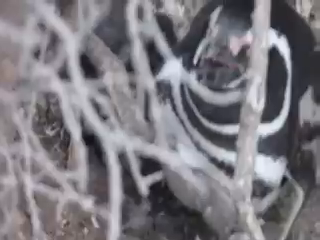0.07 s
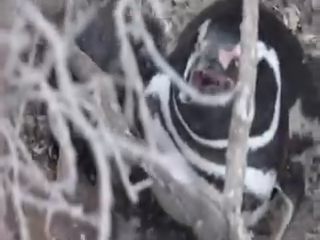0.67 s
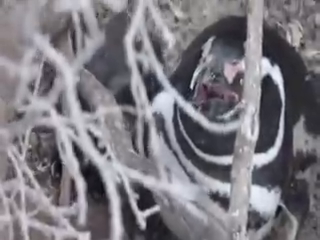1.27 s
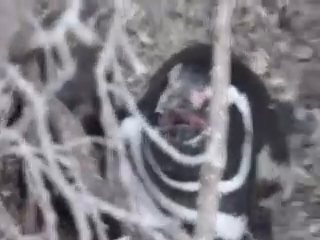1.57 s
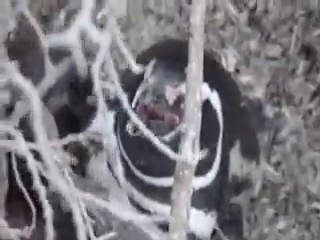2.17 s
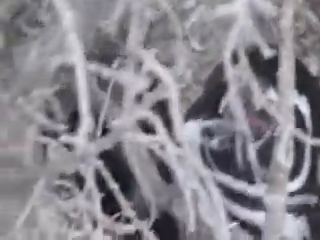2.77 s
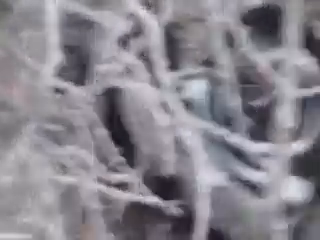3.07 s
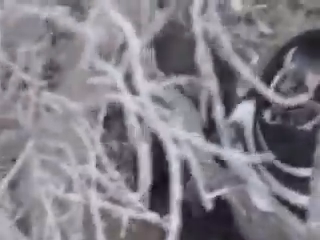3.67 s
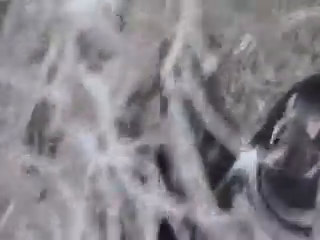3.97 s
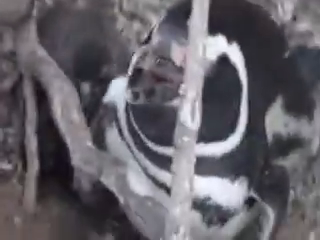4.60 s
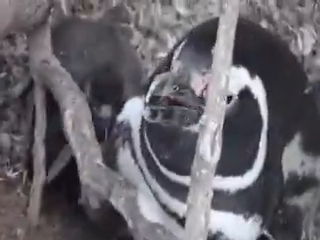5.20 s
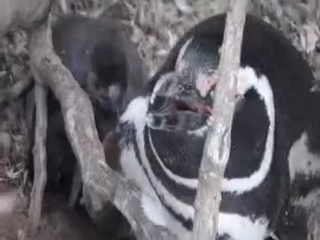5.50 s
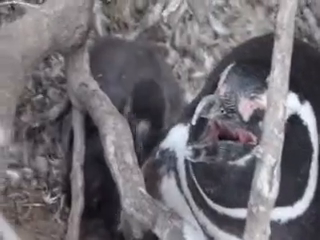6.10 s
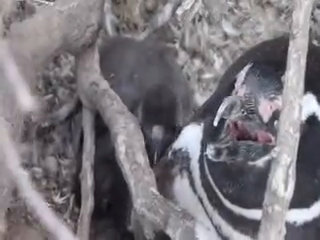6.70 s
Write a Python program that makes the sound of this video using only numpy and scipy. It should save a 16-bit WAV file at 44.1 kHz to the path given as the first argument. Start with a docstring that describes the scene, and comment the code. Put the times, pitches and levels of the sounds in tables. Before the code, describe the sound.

Steady wind hisses outdoors while a penguin chick peeps near the microphone, about three calls every two seconds. Each peep is a short cluster of high whistles that rises and falls. Soft scuffs of dry litter and hoarse squeaks fill the early gaps; later, twigs crackle briefly and thin, faint whines sag between the calls. The nest hollow adds a very slight echo.

```python
"""A penguin chick begs close by, from a nest under dry scrub: ten arched peeps, each a chord of four
whistles that ride one push of air and modulate each other in the throat. Hoarse squeaks and faint
falling whines come between them. Nest litter rustles, twigs snap, one small tick sounds, and the
nest hollow adds a short echo. Behind it a steady wind hisses; faint low noise swells three times."""
import sys
import numpy as np
from scipy import signal
from scipy.fft import rfft, irfft, next_fast_len
from scipy.io import wavfile
from scipy.ndimage import map_coordinates

SR = 44100
rng = np.random.default_rng(int(sys.argv[2]) if len(sys.argv) > 2 else 0)


def dump(signal):
    """Clip the signal to [-1, 1] and save it as 16-bit WAV at the path in sys.argv[1]."""
    limited = np.clip(np.atleast_2d(signal).T, -1, 1)
    pcm = np.round(limited * 32767).astype(np.int16)
    wavfile.write(sys.argv[1], SR, pcm)


N = 302085


def amp(db):
    return 10 ** (np.asarray(db) / 20)


def unit(x):
    return x / np.sqrt(np.mean(x ** 2) + 1e-20)


def ramp(x):
    return np.clip(x, 0, 1)


def along(points, hz):
    """Interpolate (freq_hz, value) points on a log frequency axis."""
    freq_hz, values = np.transpose(points)
    return np.interp(np.log(hz + 1), np.log(freq_hz + 1), values)


def filtered(x, response):
    """Apply the frequency response(hz) to x."""
    size = next_fast_len(len(x) + 8192)
    return irfft(rfft(x, size) * response(np.fft.rfftfreq(size, 1 / SR)), size)[:len(x)]


def noise(spectrum, n):
    """Noise at rms 1, shaped by (freq_hz, density_db) points."""
    return unit(filtered(rng.standard_normal(n), lambda hz: amp(along(spectrum, hz))))


def wobble(rate_hz, n):
    """Smooth random curve, rate_hz knots a second."""
    knots = rng.standard_normal(int(n * rate_hz / SR) + 4)
    return map_coordinates(knots, [np.arange(n) * rate_hz / SR])


def phase(hz):
    """Running phase of a gliding pitch, from a random start."""
    return 2 * np.pi * (np.cumsum(hz) / SR + rng.random())


def swell(length_s, taper):
    """Envelope with cosine ends; taper is their share of the length."""
    return signal.windows.tukey(int(length_s * SR), taper)


def add(track, start_s, sound):
    part = track[round(start_s * SR):][:len(sound)]
    part += sound[:len(part)]


def wind(level_db=-52.0, gust_db=0.14, flutter_db=0.5):
    """A broad, even rush that barely swells."""
    # wind spectrum: freq_hz, density_db
    spectrum = [(20, -15.5), (45, -8.5), (70, -5), (130, -1.5), (230, 1), (400, -1), (800, -3.5),
                (1600, -6.5), (2700, -9.5), (4000, -12), (5000, -16), (6300, -16.5), (9000, -20.5)]
    return amp(level_db + gust_db * wobble(2.23, N) + flutter_db * wobble(12, N)) * noise(spectrum, N)


def squeaks(flutter_db=3, fade_db=8):
    """Hoarse whistles that do not lock: pitch and strength scatter quickly."""
    # squeaks: start_s, length_s, start_hz, end_hz, level_db, scatter_hz
    calls = [(0.081, 0.07, 3200, 2740, -44.5, 60), (0.137, 0.063, 3120, 3130, -46.5, 90),
             (0.14, 0.2, 2605, 2260, -54, 110), (0.163, .22, 3940, 3750, -52.5, 187),
             (0.112, 0.33, 1930, 1777, -56, 190), (0.82, 0.032, 3040, 3070, -50, 130),
             (0.807, 0.29, 2530, 2083, -53, 184), (0.831, 0.122, 3890, 3860, -54.5, 100),
             (0.917, 0.22, 3590, 3340, -54.5, 90), (1.534, 0.25, 3610, 3500, -50.5, 120),
             (2.26, 0.2, 3410, 3570, -50.5, 145), (5.274, 0.11, 3370, 3280, -57, 150),
             (6.056, 0.22, 3300, 2940, -57.5, 151)]
    out = np.zeros(N)
    for start_s, length_s, start_hz, end_hz, level_db, scatter_hz in calls:
        env = swell(length_s, taper=0.4)
        n = len(env)
        env *= amp(level_db + fade_db * np.linspace(0.5, -0.5, n))
        pitch_hz = np.linspace(start_hz, end_hz, n) + scatter_hz * wobble(1400, n)
        add(out, start_s, env * unit(np.sin(phase(pitch_hz)) * amp(flutter_db * wobble(200, n))))
    return out


def low_swells():
    """Three brief, faint swells of low noise near 240 Hz."""
    # swells: start_s, length_s, level_db
    swells = [(0.097, 0.28, -56.5), (.5, 0.42, -61), (5.252, 0.45, -62.5)]
    # low noise spectrum: freq_hz, density_db
    low_band = [(120, -32), (205, -3.5), (240, 0.5), (280, -3), (400, -28)]
    env = np.zeros(N)
    for start_s, length_s, level_db in swells:
        add(env, start_s, amp(level_db) * swell(length_s, taper=0.55))
    return env * noise(low_band + [(1000, -120)], N)


def litter(clump_db=1.5, crack_t60_s=0.017, knock_t60_s=0.046, ring_hz=2780, width_hz=200, ring_db=1.0):
    """Dry stems rub in clumps of tiny grains and snap in short bursts; both ring the twigs."""
    # scuffs in the litter: start_s, length_s, dull_db, crisp_db
    scuffs = [(0.1, 0.16, -47.5, -71), (0.228, 0.18, -49.5, -55), (.8, 0.16, -53, -53.5),
              (0.889, 0.21, -54.5, -60), (1.5, 0.34, -52.5, -57.5), (1.786, 0.19, -53, -68),
              (2.24, 0.25, -55, -62.5), (2.806, 0.34, -51, -54.5), (3.065, 0.12, -44, -36),
              (3.128, 0.28, -48, -53.5), (3.356, 0.073, -50, -45), (3.357, 0.5, -58, -60.5),
              (3.541, 0.091, -55, -55.5), (3.702, 0.35, -50, -56), (4.99, 0.043, -46.5, -51),
              (5.074, 0.053, -50, -48), (6.795, 0.14, -53.5, -63)]
    # twig snaps: start_s, crack_db, knock_db
    snaps = [(0.107, -51, -44), (4.827, -68, -54), (4.889, -37, -45), (4.899, -58, -51),
             (4.926, -43.5, -49.5), (4.971, -52, -51), (5.014, -47.5, -54), (5.02, -47, -52),
             (5.0359, -28.5, -42), (5.095, -41, -58)]
    # rustle and knock spectrum: freq_hz, density_db
    dull_spectrum = [(1400, -37), (2300, -7), (2650, -4), (3250, -3), (3700, -3), (4500, -7), (6000, -23.5),
                     (9000, -26)]
    # crackle and crack spectrum: freq_hz, density_db
    crisp_spectrum = [(1500, -39.5), (3000, -14.5), (4200, -23), (5200, 3), (6100, 2.5), (7000, -7),
                      (9500, -8)]
    dull, crisp = np.zeros(N), np.zeros(N)
    for start_s, length_s, dull_db, crisp_db in scuffs:
        env = swell(length_s, taper=0.59)
        add(dull, start_s, amp(dull_db) * env)
        add(crisp, start_s, amp(crisp_db) * env)
    clumps = unit(amp(clump_db * wobble(350, N)))
    dull, crisp = dull * clumps, crisp * clumps
    t = np.arange(SR // 10) / SR
    attack = 2 * (1 - np.exp(-t / 0.00057))
    for start_s, crack_db, knock_db in snaps:
        add(dull, start_s, attack * amp(knock_db - 60 * t / knock_t60_s))
        add(crisp, start_s, attack * amp(crack_db - 60 * t / crack_t60_s))

    def twig(hz):
        damping = 1j * hz * width_hz
        return 0.79 + amp(ring_db) * damping / (ring_hz ** 2 - hz ** 2 + damping)
    return filtered(dull * noise(dull_spectrum, N), twig) + crisp * noise(crisp_spectrum, N)


def whines(jitter=0.018, third_harmonic_db=-8, flutter_db=3):
    """Thin, unsteady notes that hold their pitch, then sag."""
    # whines: start_s, length_s, start_hz, end_hz, fundamental_db, octave_db
    calls = [(0.404, 0.075, 1690, 1520, -67.5, -54.5), (2.482, 0.075, 1777, 1476, -62, -63),
             (4.424, 0.26, 1807, 1674, -59, -54.5), (5.19, 0.2, 1836, 1764, -59, -61),
             (5.321, 0.15, 1920, 1650, -56, -59), (6.049, 0.3, 2048, 1685, -56.5, -57)]
    out = np.zeros(N)
    for start_s, length_s, start_hz, end_hz, fundamental_db, octave_db in calls:
        env = swell(length_s, taper=0.11)
        n = len(env)
        env *= unit(amp(flutter_db * wobble(120, n)))
        pitch_hz = start_hz + (end_hz - start_hz) * np.linspace(0, 1, n) ** 2
        p = phase(pitch_hz * (1 + jitter * wobble(500, n)))
        odd = amp(fundamental_db) * (np.sin(p) + amp(third_harmonic_db) * np.sin(3 * p))
        add(out, start_s, env * (odd + amp(octave_db) * np.sin(2 * p)))
    return out


def whistles(shape, attack_s=0.0025, release_s=0.024, accent_db=2, accent_s=0.029,
             tail_s=0.044, tail_db=-59, tail_sag_per_s=1.7):
    """Pitches and strengths of four whistles: the push rises fast, sways on its crest and falls away."""
    # response to the crest's climb and dip, per whistle: ratio
    sway_ratio = [.7, 0.63, 0.86, 1.1]
    # response to the fall, per whistle: ratio
    fall_ratio = [.68, 0.74, 1, 1.05]
    # early overshoot of the crest, per whistle: log_pitch
    overshoot_log = [.005, .008, .012, .022]
    # level lost as the push slackens, per whistle: db_per_log_pitch
    slack_db = [35.2, 37.7, 23, 22.6]
    length_s, rise_s, fall_s, *crest_hz, climb_log, dip_log, dip_share, scoop_log = shape[:11]
    low_db, third_db, top_db, throat_hz, throat_db, fade_in_s, fade_out_s = shape[11:]
    rise_log, fall_log, throat_width_hz = 0.365, 0.396, 270
    t = np.arange(int((length_s + tail_s) * SR)) / SR
    left_s, progress = length_s - t, t / length_s

    rising = np.exp(-t / rise_s)
    falling = fall_log * np.maximum(1 - left_s / fall_s, 0) ** 1.9
    falling += tail_sag_per_s * np.maximum(-left_s, 0)
    sway = climb_log * (progress - 0.5) - dip_log * np.exp(-((progress - dip_share) / 0.0837) ** 2)
    arch = np.outer(sway_ratio, sway) - np.outer(fall_ratio, falling)
    arch -= np.outer([scoop_log, scoop_log, rise_log, rise_log], rising)
    arch += np.outer(overshoot_log, np.exp(-((t - 0.062) / 0.0211) ** 2))
    pitch_hz = np.c_[crest_hz] * np.exp(arch)

    crest_db = np.c_[[low_db - 1.5, low_db, third_db, top_db]]
    strength = amp(crest_db - np.outer(slack_db, rise_log * rising + falling))
    # the upper pair sweeps through the throat resonance
    throat = amp(throat_db * np.exp(-((pitch_hz[2:] - throat_hz) / throat_width_hz) ** 2))
    accent = amp(accent_db * np.exp(-t / accent_s))
    strength[2:] *= throat * accent * ramp(t / fade_in_s) ** 2 * ramp(left_s / fade_out_s)
    strength[:2] *= ramp(left_s / release_s)
    # the lowest whistle slides on faintly after the others stop
    strength[0] = np.maximum(strength[0], amp(tail_db) * ramp((left_s + tail_s) / release_s))
    return pitch_hz, strength * ramp(t / attack_s)


def peep(shape, rasp_db, quaver=0.005, drift=0.004, jitter=0.004,
         shimmer_db=1.64, waver_db=0.84, rough_db=1, knee_hz=2400):
    """Four whistles on one push of air; nonlinear membranes add octaves, sum tones and sidebands."""
    # air in the throat: freq_hz, density_db
    rasp_spectrum = [(1900, -28.5), (2350, -12.5), (2900, -1), (3400, -0.5), (4300, -3.5), (5000, -5.5),
                     (6300, -21.5), (7500, -5.5), (9500, -11.5)]
    pitch_hz, strengths = whistles(shape)
    n = pitch_hz.shape[1]
    push = 1 + quaver * wobble(45, n)  # bends all four pitches together
    p1, p2, p3, p4 = [phase(hz * push * (1 + drift * wobble(110, n) + jitter * wobble(900, n)))
                      for hz in pitch_hz]
    for strength in strengths:
        strength *= amp(shimmer_db * wobble(70.2, n) + waver_db * wobble(19.5, n))
        strength *= amp(rough_db * wobble(450, n))
    a1, a2, a3, a4 = strengths
    chord = a1 * np.sin(p1) + a2 * np.sin(p2) + a3 * np.sin(p3) + a4 * np.sin(p4)
    octaves = amp(-12) * a1 * np.sin(2 * p1) + amp(-17) * a2 * np.sin(2 * p2)
    octaves *= np.maximum(knee_hz / pitch_hz[0], 1) ** 3.5  # throat muffles low notes, not their octaves
    octaves += amp(-26) * (a3 * np.sin(2 * p3) + a4 * np.sin(2 * p4))
    sums = amp(-19) * (np.sqrt(a1 * a3) * np.sin(p1 + p3) + np.sqrt(a2 * a4) * np.sin(p2 + p4))
    sums += amp(-27) * (np.sqrt(a2 * a3) * np.sin(p2 + p3) + np.sqrt(a1 * a4) * np.sin(p1 + p4))
    sums *= amp(2 * shimmer_db * wobble(32, n))
    sidebands = amp(-16) * np.sqrt(a3 * a4) * (np.sin(p1 + p4 - p3) + 0.5 * np.sin(2 * p4 - p3))
    rasp = amp(rasp_db) * unit(np.hypot(a3, a4)) * noise(rasp_spectrum, n)
    return chord + octaves + sums + sidebands + rasp


def begging():
    """The chick's peeps, about 1.5 a second."""
    # peeps: start_s, length_s, rise_s, fall_s, crest1_hz, crest2_hz, crest3_hz, crest4_hz,
    # climb_log, dip_log, dip_share, scoop_log, low_db, third_db, top_db, throat_hz, throat_db,
    # fade_in_s, fade_out_s, rasp_db (_log: natural log of a pitch ratio; dip_share: place in the peep)
    calls = [(.552, 0.3, 0.02, 0.13, 2370, 2600, 3237, 3956, -0.025, -.02, .39, .26, -51.5, -46, -52, 3090, 9.5, 0.0098, .03, -61),
             (1.133, 0.33, 0.034, 0.11, 2443, 2630, 3486, 4014, 0.08, 0.0093, 0.43, 0.25, -46, -46.5, -41, 2910, 12.5, 0.019, 0.033, -57.5),
             (1.745, 0.35, .027, 0.094, 2430, 2610, 3520, 4096, -0.035, 0.00027, .38, 0.31, -48.5, -47.5, -43.5, 3045, 14, 0.0077, 0.044, -58),
             (2.429, 0.297, 0.034, .13, 2506, 2730, 3660, 4290, -0.025, .019, 0.38, .24, -46.5, -46, -44.5, 3026, 13.5, 0.0031, 0.022, -57),
             (3.035, 0.34, 0.022, .118, 2455, 2700, 3648, 4110, 0.08, -0.027, .6, 0.24, -43.5, -40.5, -50.5, 3020, 5.5, .004, 0.013, -57),
             (3.684, 0.35, .02, 0.11, 2470, 2740, 3670, 4200, -0.055, 0.018, .29, 0.29, -40, -38, -52, 2930, 0.5, 0.053, 0.024, -54),
             (4.36, 0.28, 0.022, .084, 2393, 2604, 3400, 3840, -0.11, -0.011, 0.53, .31, -40, -43.5, -47, 3100, 4.5, 0.028, 0.014, -54.5),
             (5.054, .27, 0.015, .1, 2423, 2540, 3176, 3715, -0.083, .027, .37, 0.54, -39, -43, -43, 2980, -5, 0.033, 0.085, -61.5),
             (5.762, 0.28, 0.018, 0.12, 2344, 2540, 3230, 3690, -0.04, 0.04, .4, 0.37, -42.5, -43.5, -42.5, 2610, 10, 0.06, 0.061, -66),
             (6.393, 0.29, 0.018, 0.15, 2412, 2560, 3160, 3750, 0.051, 0.034, 0.38, 0.34, -39.5, -44.5, -40.5, 2520, 9.5, .03, 0.075, -55.5)]
    out = np.zeros(N)
    for start_s, *shape, rasp_db in calls:
        add(out, start_s, peep(shape, rasp_db))
    return out


def tick(start_s=1.931, length_s=0.011, level_db=-40, start_hz=1750, rise_hz=600):
    """One small tick whose pitch flicks upward."""
    env = swell(length_s, taper=1)
    pitch_hz = start_hz + rise_hz * np.linspace(0, 1, len(env)) ** 0.5
    out = np.zeros(N)
    add(out, start_s, amp(level_db) * env * np.sin(phase(pitch_hz)))
    return out


def hollow(x, t60_s=0.035, wet_db=-17):
    """The nest hollow and the branches scatter a short, weak echo."""
    t = np.arange(SR // 5) / SR
    tail = rng.standard_normal(len(t)) * amp(-60 * t / t60_s)
    return x + amp(wet_db) * signal.fftconvolve(x, tail / np.linalg.norm(tail))[:N]


def scene():
    """Wind and low swells behind the echoing nest; mono."""
    background = wind() + low_swells()
    nest = squeaks() + litter() + whines() + begging() + tick()
    return (background + hollow(nest))[None]


def record(dry, open_s=0.097, cutoff_hz=10200, notch_depth=0.97):
    """The microphone opens after a moment; its treble is dull, with two notches."""
    # microphone response: freq_hz, gain_db
    treble = [(6400, 2), (7200, -2), (7700, -15.5), (8500, -10), (9000, -12), (10000, -27)]
    # microphone dead spots: centre_hz, width_hz
    notches = [(5450, 194), (8100, 590)]

    def response(hz):
        gain = amp(along(treble, hz)) * (hz < cutoff_hz)
        for centre_hz, width_hz in notches:
            gain *= 1 - notch_depth * np.exp(-((hz - centre_hz) / width_hz) ** 2)
        return gain
    return filtered(dry[0] * (np.arange(N) > open_s * SR), response)[None]


dry = scene()
out = record(dry)
dump(out)
```